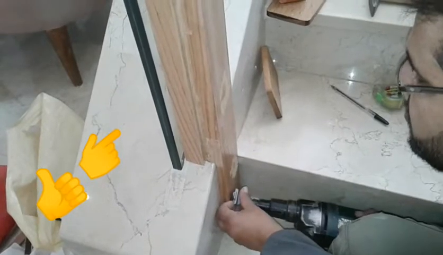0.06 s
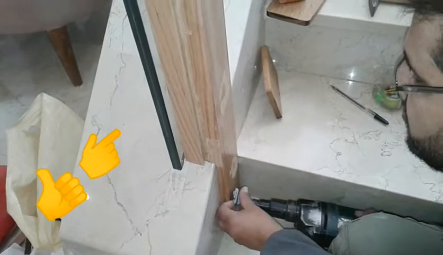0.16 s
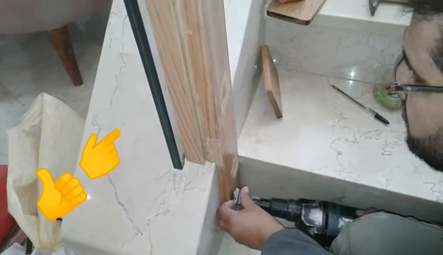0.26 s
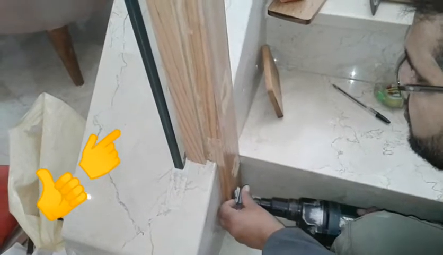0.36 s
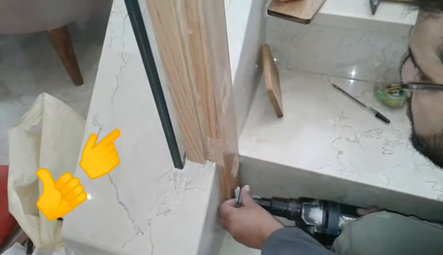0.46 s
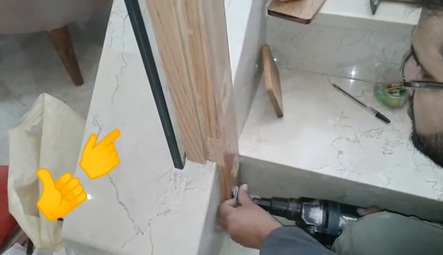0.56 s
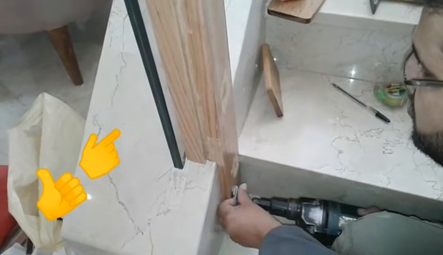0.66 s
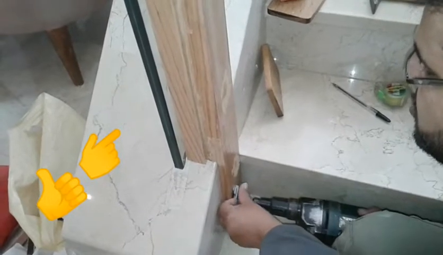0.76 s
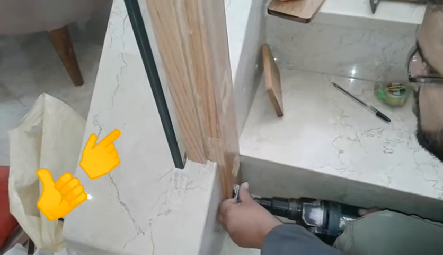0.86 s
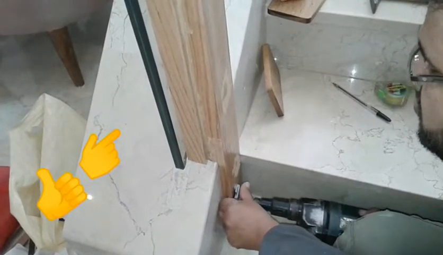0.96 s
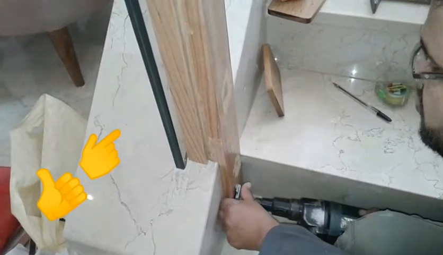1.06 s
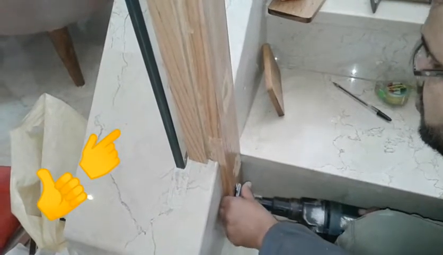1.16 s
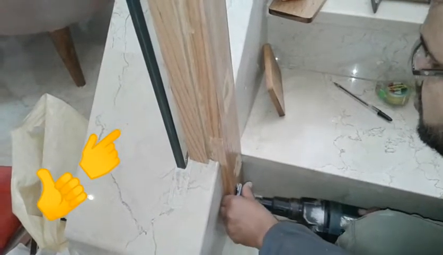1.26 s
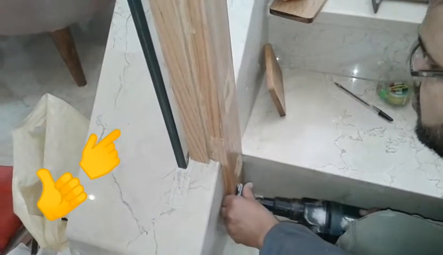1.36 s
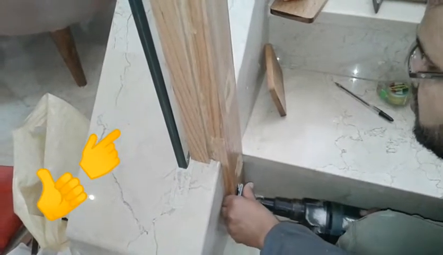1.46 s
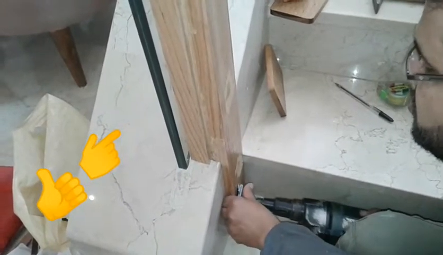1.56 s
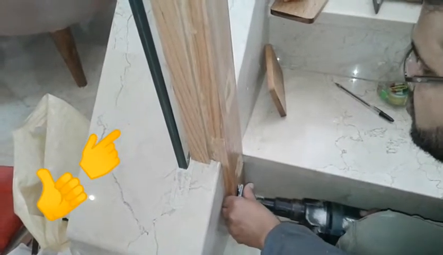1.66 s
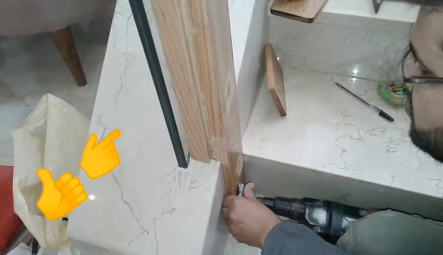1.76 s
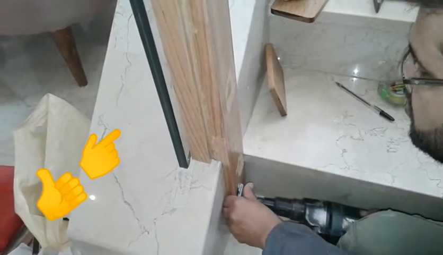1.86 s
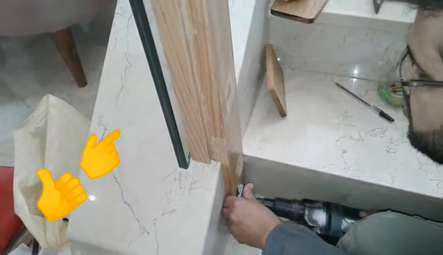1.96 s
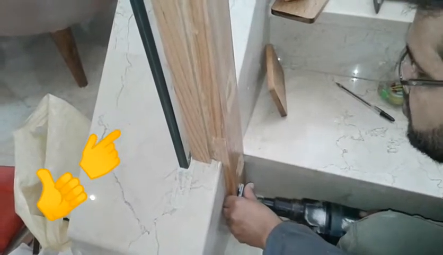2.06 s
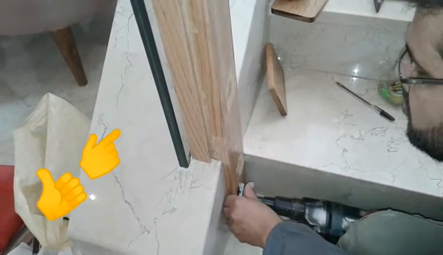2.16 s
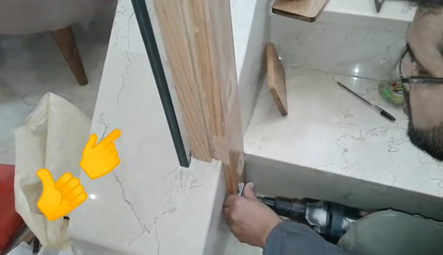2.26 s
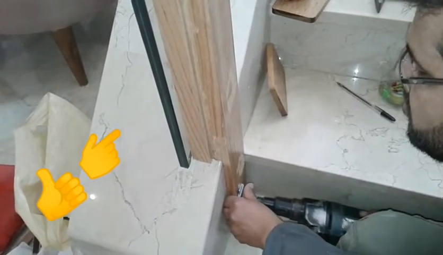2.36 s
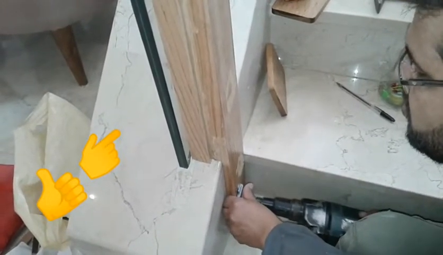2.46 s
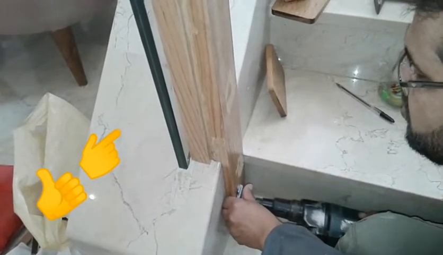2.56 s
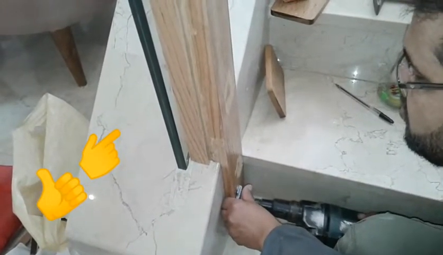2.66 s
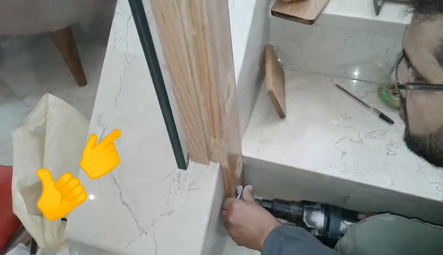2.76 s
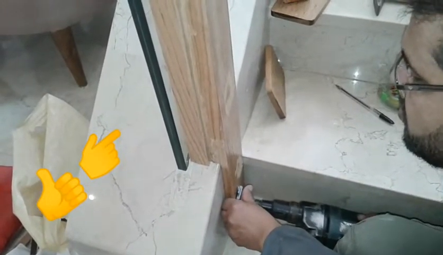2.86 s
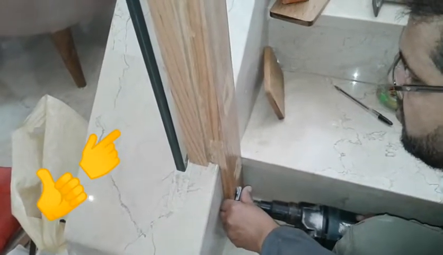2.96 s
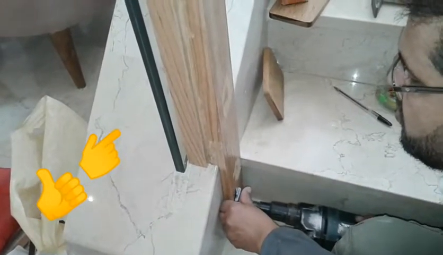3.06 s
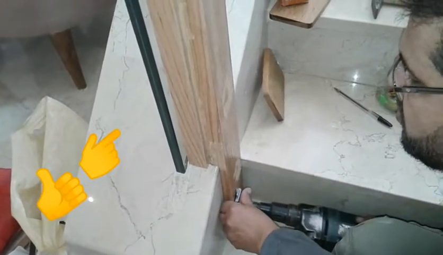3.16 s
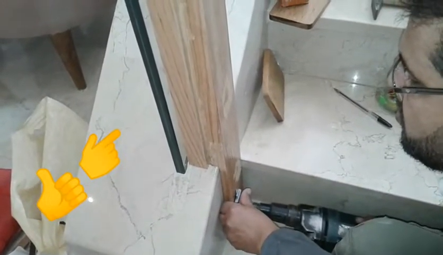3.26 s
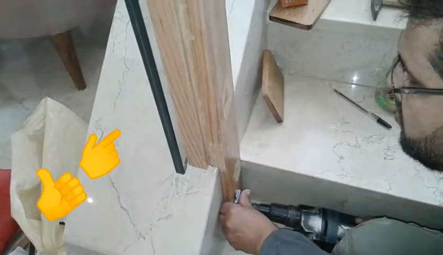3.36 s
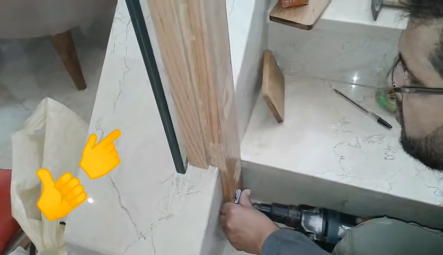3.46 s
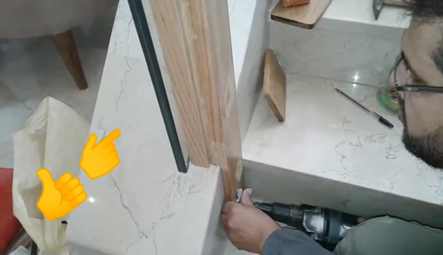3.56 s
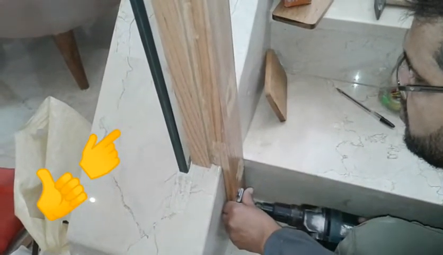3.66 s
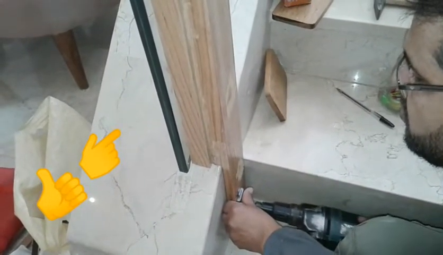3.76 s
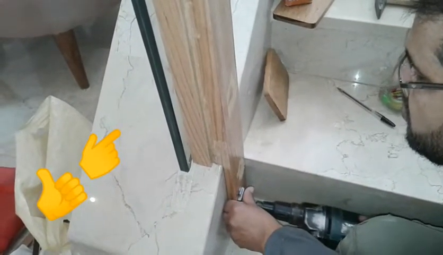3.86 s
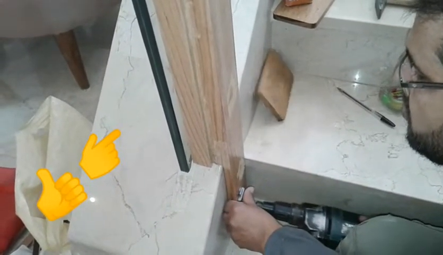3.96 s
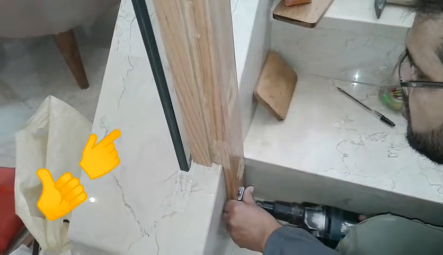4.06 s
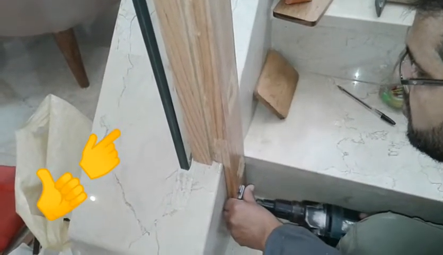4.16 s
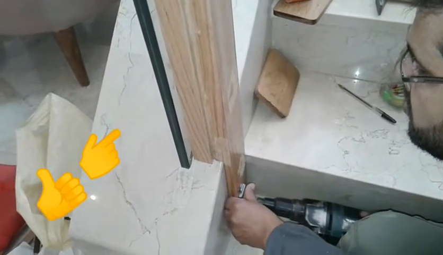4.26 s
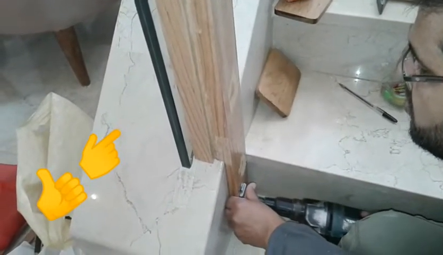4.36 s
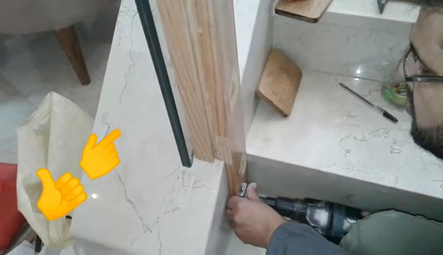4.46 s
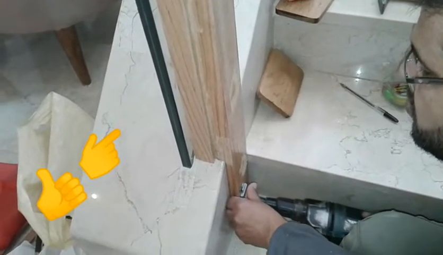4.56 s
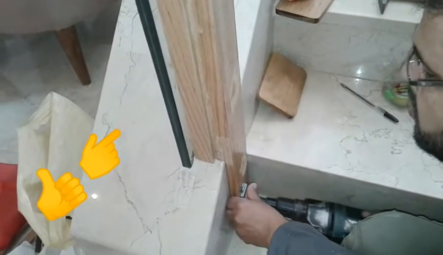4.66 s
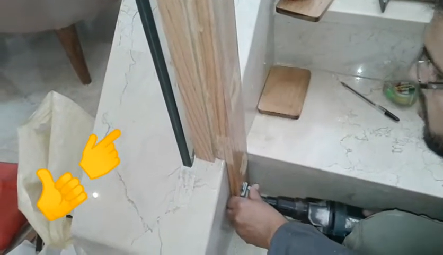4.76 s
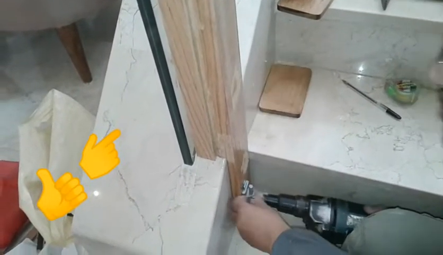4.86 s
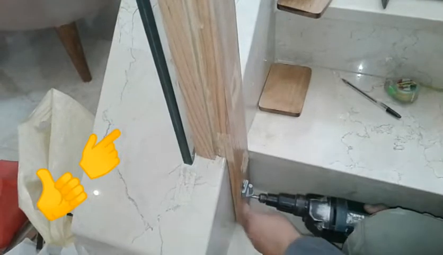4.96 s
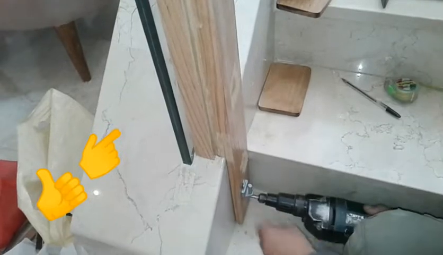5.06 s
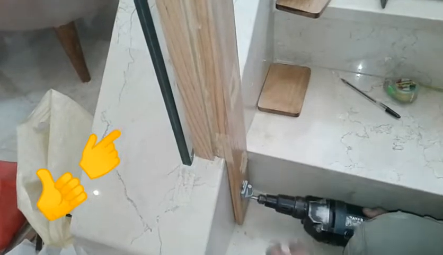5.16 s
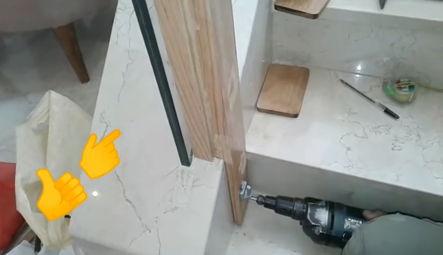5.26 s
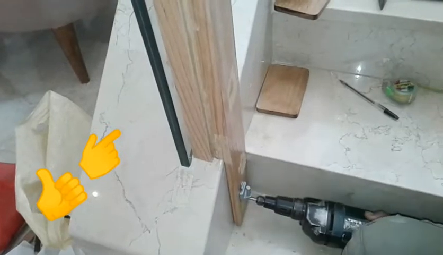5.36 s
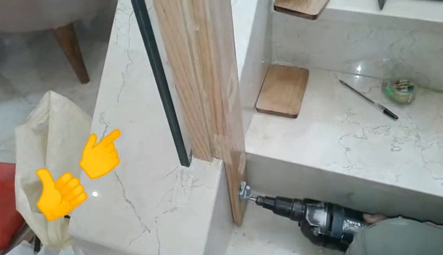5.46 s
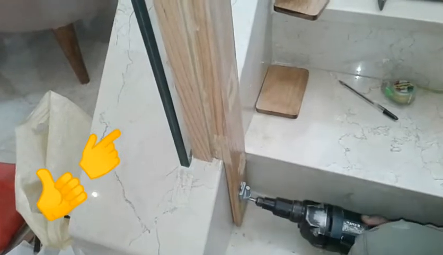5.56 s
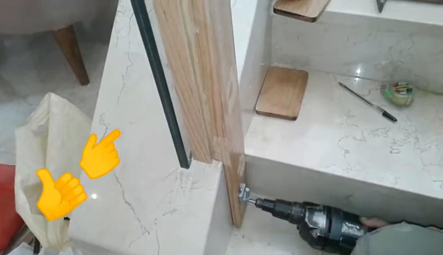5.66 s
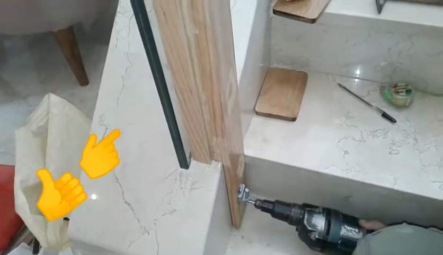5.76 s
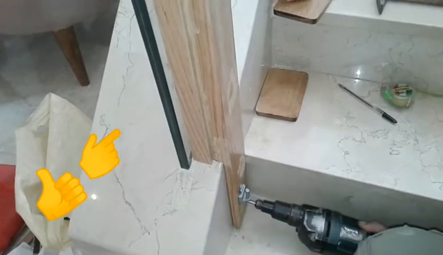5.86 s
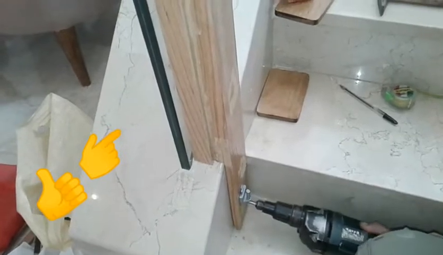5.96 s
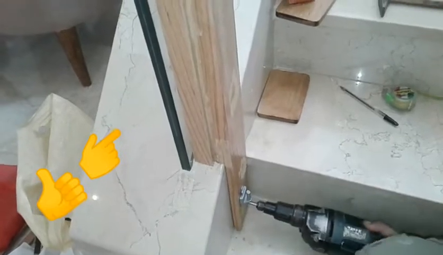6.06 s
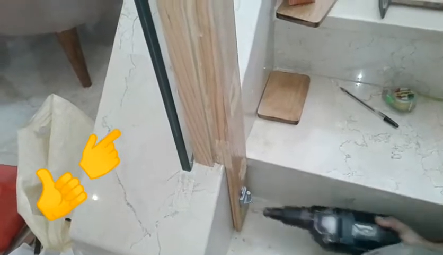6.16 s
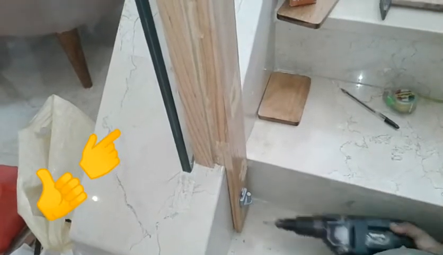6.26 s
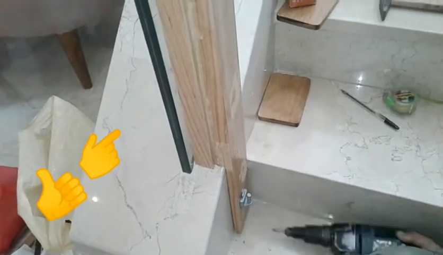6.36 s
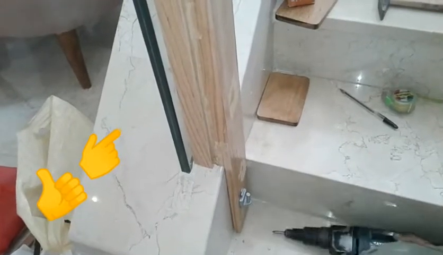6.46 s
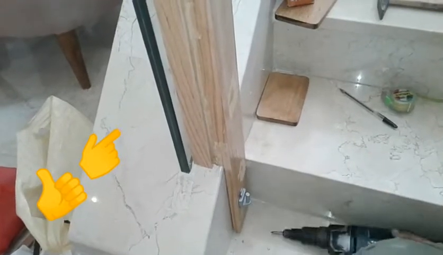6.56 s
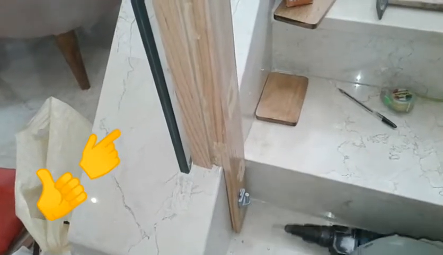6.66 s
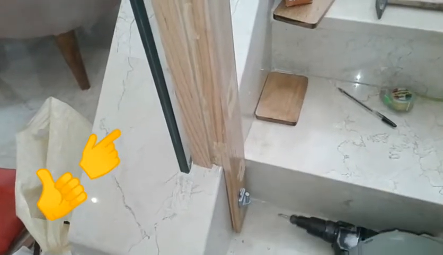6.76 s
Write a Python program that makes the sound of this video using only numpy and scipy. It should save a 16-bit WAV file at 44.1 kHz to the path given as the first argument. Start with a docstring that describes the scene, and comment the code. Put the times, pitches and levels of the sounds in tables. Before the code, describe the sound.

Close, harsh power drill whirring with rapid hammering buzz in a hard-walled tiled room, slowing to a coast before a quick metallic clatter.

```python
"""A corded drill works into a wooden door frame, close by, in a small tiled room.
The motor, noise pulsing per turn plus shaft-locked tones, speeds up and coasts with the trigger.
The bit hammers about once in 16 to 19 motor turns: noise crunches ring modes whose colour shifts.
The frame shudders (coloured noise) and hums (slow shaft tones); hard walls answer the blows.
Eased off, the tool runs down, the bit chatters once more, and the tool clacks off a steel bracket."""
import sys
import numpy as np
from scipy import signal
from scipy.fft import rfft, irfft, next_fast_len
from scipy.io import wavfile
from scipy.ndimage import uniform_filter1d, minimum_filter1d, map_coordinates

SR = 44100
rng = np.random.default_rng(int(sys.argv[2]) if len(sys.argv) > 2 else 0)


def bounce(signal):
    """Save signal as a 16-bit WAV file at the path given by the first command-line argument."""
    frames = np.transpose(np.atleast_2d(signal))
    limited = np.clip(frames, -1, 1)
    pcm = np.round(limited * 32767).astype(np.int16)
    wavfile.write(sys.argv[1], SR, pcm)


N = 299880


def amp(db):
    """Decibels to gain."""
    return 10 ** (np.asarray(db) / 20)


def unit(x):
    """Each row at rms 1."""
    return x / np.sqrt(np.mean(x ** 2, axis=-1, keepdims=True) + 1e-20)


def along(points, hz):
    """Interpolate (f/Hz, value) points on a log frequency axis."""
    f, value = np.transpose(points)
    return np.interp(np.log(hz + 1), np.log(f + 1), value)


def curves(rows):
    """One value per sample for each column after the time."""
    s, *columns = np.transpose(rows)
    return [np.interp(np.arange(N) / SR, s, column) for column in columns]


def wobble(rate_hz):
    """Smooth random curve with rate_hz knots a second."""
    knots = rng.standard_normal(int(N * rate_hz / SR) + 4)
    return map_coordinates(knots, [np.arange(N) * rate_hz / SR])


def filtered(x, response):
    """Multiply the spectrum of x by a response of frequency."""
    n = x.shape[-1]
    padded = next_fast_len(n + min(n, SR // 4))
    spectrum = rfft(x, padded) * response(np.fft.rfftfreq(padded, 1 / SR))
    return irfft(spectrum, padded)[..., :n]


def noise(spectrum):
    """Coloured noise of rms 1."""
    return unit(filtered(rng.standard_normal(N), lambda hz: amp(along(spectrum, hz))))


def placed(times_s, sounds):
    """Sum the rows of sounds, each laid down at its time."""
    starts = np.round(times_s * SR).astype(int)[:, None]
    at = np.maximum(starts + np.arange(sounds.shape[1]), 0)
    return np.bincount(at.ravel(), sounds.ravel(), N)[:N]


def burst(t, rise_s, t60_s):
    """Linear rise to 1, then exponential decay."""
    t = np.maximum(t, 0)
    return np.minimum(t / rise_s, 1) * amp(-60 * np.maximum(t - rise_s, 0) / t60_s)


def resonances(f, modes):
    """Summed response of damped modes (f/Hz, width/Hz, level/dB)."""
    return sum(amp(db) * 1j * f * w / (c * c - f * f + 1j * f * w) for c, w, db in modes)


# motor speed targets under the trigger: t/s, shaft f/Hz reached, time constant of the approach/s
SHAFT_TARGETS = [(0, 293.6, 1.7), (.14, 268.9, 1.7), (.69, 418.4, .22), (1.47, 265.2, 1.7),
                 (2.1, 416.5, .21), (3.15, 441.4, .9), (3.3, 434, 1.7), (3.4, 424.5, 1.7),
                 (3.77, 339.6, 1.7), (4.37, 428.8, .28), (5.03, 275.8, .95), (5.62, 217.1, 3),
                 (6.08, 156.3, 1.7), (6.8, 110, 1.8)]


def shaft_speed():
    """Turns a second: the motor approaches each target exponentially from the one before."""
    s, hz, lag_s = np.transpose(SHAFT_TARGETS)
    t = np.arange(N) / SR
    to = np.minimum(np.searchsorted(s, t, side="right"), len(s) - 1)
    elapsed = np.expm1((s[to - 1] - t) / lag_s[to])
    whole = np.expm1((s[to - 1] - s[to]) / lag_s[to])
    return hz[to - 1] + (hz[to] - hz[to - 1]) * elapsed / whole


# lean of the tool on the work: t/s, load (0 free, 1 normal push)
LOAD = [(0, 1.33), (.12, 1.07), (.33, 1.26), (.86, 1.37), (1.08, 1.11), (1.3, 1), (1.55, 1.2), (1.75, 1.03),
        (2.02, 1.1), (2.3, 0.89), (2.65, 1.09), (3.02, 0.88), (3.35, 1.13), (3.68, 0.89), (4.1, 1.14),
        (4.76, 0.93), (5.12, 0.14), (5.53, 0), (5.72, 0.6), (6.02, 0.25), (6.18, 0.17), (6.55, 0),
        (6.75, 0.28)]
FULL_HZ = 430


def level(law, speed):
    """A layer's dB: set by shaft speed and by load."""
    full_db, octave_db, load_db = law
    return full_db + octave_db * np.log2(speed / FULL_HZ) + load_db * (curves(LOAD)[0] - 1)


def shaken(blow_times_s, surge_db, settle_t60_s):
    """Gain: each blow loads gears and bit, so their noise jumps up and decays; slow average removed."""
    since_s = np.arange(SR // 8) / SR
    surge = burst(since_s, 0.0034, settle_t60_s)
    load = placed(blow_times_s, np.tile(surge, (len(blow_times_s), 1)))
    return amp(surge_db * (load - uniform_filter1d(load, size=4000)))


def patchy(x, patchy_db):
    """Resonances come and go: random gain, smooth over some 400 Hz and 80 ms."""
    z = signal.stft(x, nperseg=512)[2]
    field = uniform_filter1d(rng.standard_normal(z.shape), size=5, axis=0)
    field = uniform_filter1d(field, size=14, axis=1)
    gain = amp(patchy_db * field / np.std(field))
    return unit(signal.istft(z * gain, nperseg=512)[1][:N])


# noise spectra of gear rush, grinding, hiss and rasp: f/Hz, relative level/dB
GEARS = [(1500, -38), (2350, -7), (2650, -0.5), (3000, -0.5), (3800, 3.5), (4200, 0.5), (4620, 4.5),
         (5200, -3), (5750, -2.5), (6350, -4.5), (6800, -12.5), (9000, -27), (12000, -49)]
GRIND = [(700, -28.5), (1000, 2.5), (1400, -1), (1650, 0), (1950, 1.5), (2300, 3.5), (2800, -1.5),
         (5000, -57)]
HISS = [(4000, -48), (7000, 3.5), (9300, 0), (10200, -9), (12000, -10), (14000, -4), (15800, -2.5)]
RASP = [(1200, -35), (1500, -13), (1750, -1.5), (1950, -5), (2100, 2), (2450, -37)]
# their level laws: level/dB at FULL_HZ and load 1, slope/(dB/octave of speed), slope/(dB/unit load)
RUSH_LAW = (-25.5, 4.96, 7.4)
GRIND_LAW = (-31.5, 3.7, 8.7)
HISS_LAW = (-42.5, 7.6, 6.5)
RASP_LAW = (-29.5, 1.5, 21)  # before the factor blend squared
# blend between two knock colours: t/s, share of the second (0-1)
BLEND = [(0, 0.07), (2, 0.06), (2.5, 0.58), (3, .6), (3.6, 0.94), (4.55, 0.87), (5, 0.59), (5.6, 0.69),
         (6.8, 1)]


def rubbing(speed, turn, blow_times_s, once_per_turn=0.14, flutter_db=1.0):
    """Teeth, brushes and bit rub: noise pulsing once a turn, surging at each blow; rasp follows blend."""
    rub = amp(level(RUSH_LAW, speed)) * patchy(noise(GEARS), patchy_db=1.0)
    rub += amp(level(GRIND_LAW, speed)) * noise(GRIND)
    rub += amp(level(HISS_LAW, speed)) * noise(HISS)
    rub += amp(level(RASP_LAW, speed)) * curves(BLEND)[0] ** 2 * noise(RASP)
    bite = unit((1 + once_per_turn * np.cos(turn)) * amp(flutter_db * wobble(160)))
    return rub * bite * shaken(blow_times_s, surge_db=3.0, settle_t60_s=0.13)


# vent resonance: f/Hz, relative level/dB
VENT = [(400, -33), (560, -14), (660, -0.5), (790, 2), (880, -7.5), (1050, -11), (1600, -45)]
# level/dB at FULL_HZ and load 1, slope/(dB/octave of speed), slope/(dB/unit load)
VENT_LAW = (-32.5, 3.5, 9.1)


def vents(speed, turn, tone_db=-7):
    """Rushing air, and a second-order tone that swells as it crosses the vent resonance."""
    vent_db = level(VENT_LAW, speed)
    unsteady_db = 3.5 * wobble(14)
    phase = 2 * turn + .6 * wobble(50)
    tone = amp(vent_db + tone_db + along(VENT, 2 * speed) + unsteady_db) * np.sin(phase)
    return amp(vent_db) * noise(VENT) + np.sqrt(2) * tone


# level of the whine through the casing, at load 1: f/Hz, rms level/dB
WHINE = [(3200, -46), (4000, -36), (4700, -54), (5300, -55), (5700, -35), (6400, -56), (6900, -42),
         (7400, -67), (7900, -46.5), (8600, -52), (10500, -56), (12100, -53), (12600, -48.5), (12900, -41),
         (13300, -40.5)]


def rotor_whine(speed, turn, load_db=8):
    """Rotor tone at 30 times shaft speed, coloured by the casing, louder under load."""
    db = along(WHINE, speed * 30) + load_db * (curves(LOAD)[0] - 1) + 2 * wobble(40)
    return np.sqrt(2) * amp(db) * np.sin(30 * turn)


# gear and fan tones: multiple of shaft speed, level/dB re gear rush, extra level/dB while speeding up
ORDERS = [(12, -35, 15), (19, -31, 0), (24, -22, 0), (36, -26, 0), (48, -19, 0), (60, -9, 0), (72, -14, 0),
          (96, -10, 0), (108, -8, 0)]
# casing gain for these tones: f/Hz, gain/dB
CASING = [(500, -7.5), (1500, -1), (2300, 10.5), (2640, 12), (2850, 25), (3200, 14), (5000, 9), (7000, -11),
          (10500, -27), (16000, -31), (17500, -120)]


def gear_tones(speed, turn, backlash_rad=0.57):
    """Shaft orders through the casing; the pinion sings louder, tones roughen, as gears are sped up."""
    rush_db = level(RUSH_LAW, speed)
    acceleration = uniform_filter1d(np.gradient(speed) * SR, size=2000)
    drive = np.clip(acceleration / 250, 0, 1)
    tones = np.zeros(N)
    for order, order_db, drive_db in ORDERS:
        db = rush_db + order_db + drive_db * drive + along(CASING, order * speed) + 3.5 * wobble(25)
        roughness = backlash_rad * drive * wobble(400)
        tones += amp(db) * np.sin(order * turn + roughness)
    return np.sqrt(2) * tones


def motor(speed, blow_times_s, waver=0.00213):
    """Rubbing noise, air, whine and gear tones share one slightly wavering shaft angle."""
    turn = 2 * np.pi * np.cumsum(speed * (1 + waver * wobble(160))) / SR
    noises = rubbing(speed, turn, blow_times_s) + vents(speed, turn)
    return noises + rotor_whine(speed, turn) + gear_tones(speed, turn)


# shudder spectrum: f/Hz, relative level/dB
FRAME = [(26, -54), (45, -43), (75, -15.5), (100, -12.5), (117, -8), (151, -13), (226, -1), (265, -6.5),
         (324, 1), (387, -4), (417, -6), (560, -2.5), (730, -35), (1230, -120)]
# jolts as the tool labours, chatters or leaves: t/s, half-length to 1/e/s, extra shudder level/dB
JOLTS = [(1.414, 0.074, 9.5), (1.6, 0.072, 7), (4.774, 0.15, 9.5), (5.01, 0.11, 7.5), (5.916, 0.19, 9),
         (6.577, 0.055, 12.5)]
# slow shafts and bearings: multiple of motor speed, relative level/dB
LOW_ORDERS = [(.27, 1), (.54, -2), (.755, -2.5), (1, 0)]
# frame's uptake of their hum: f/Hz, gain/dB
UPTAKE = [(60, -24), (116, -20.5), (170, -7.5), (222, -15), (233, -5.5), (237, 4), (246, -4.5), (330, -4),
          (380, -5), (450, -6)]
# level/dB at FULL_HZ and load 1, slope/(dB/octave of speed), slope/(dB/unit load)
SHUDDER_LAW = (-47.5, -1.7, 11.8)
HUM_LAW = (-50, 3.3, 4.3)


def frame(speed, throb_db=2.0):
    """The door frame shudders as throbbing noise under load, and hums along with the slow shafts."""
    t = np.arange(N) / SR
    jolt_db = sum(db * np.exp(-((t - s) / length) ** 2) for s, length, db in JOLTS)
    throbbing = unit(noise(FRAME) * amp(throb_db * wobble(30)))
    shudder = amp(level(SHUDDER_LAW, speed) + jolt_db) * throbbing
    turn = 2 * np.pi * np.cumsum(speed * (1 + 0.0057 * wobble(20))) / SR
    hum = np.zeros(N)
    for order, order_db in LOW_ORDERS:
        db = order_db + along(UPTAKE, order * speed) + 2.7 * wobble(11)
        hum += amp(db) * np.sin(order * turn)
    return shudder + amp(level(HUM_LAW, speed)) * hum


TURNS_PER_BLOW, HAMMER_FROM_S, HAMMER_TO_S = 16, .05, 5.11
# delay of blows while the bit gives way: t/s, extra motor turns per blow
GIVE = [(.05, .01), (.14, 2.32), (.25, 0), (.35, 1.75), (.65, 1.25), (.73, .47), (1.38, .08), (1.71, 1.35),
        (2, 2.66), (2.18, 2.34), (2.44, 1.25), (3.17, .65), (3.54, .21), (4.45, .12), (4.77, 0),
        (4.93, .55)]
# mean blow strength: t/s, low knock relative level/dB, high clack relative level/dB
FORCE = [(.05, -20, -17), (.5, -20.5, -15.5), (.72, -24.5, -19), (1.07, -23, -16.5), (1.32, -23, -18),
         (1.55, -24, -14), (1.8, -22.5, -17.5), (2.3, -22, -18.5), (2.58, -22, -20.7), (2.95, -24, -18.5),
         (3.45, -23, -19.5), (3.68, -17.5, -16.5), (4, -18.5, -17), (4.22, -23, -17), (4.4, -20.5, -17.5),
         (4.73, -24, -15), (5.03, -21.5, -20.5), (5.1, -32, -38)]
# bit catching out of step, then chattering as it lifts off: t/s, clack relative level/dB
CATCHES = [(.006, -20.5), (.031, -29), (.088, -21), (.148, -18), (1.395, -17), (1.492, -16), (4.846, -25),
           (5.571, -21), (5.608, -24), (5.638, -18), (5.678, -18.5), (5.713, -18.5), (5.753, -18),
           (5.794, -17.5), (5.834, -18.5), (5.875, -20), (5.919, -19), (5.966, -19), (6.017, -19.5),
           (6.079, -27)]


def strikes(speed, knock_scatter_db=1.5, clack_scatter_db=1.0, catch_knock_db=-6):
    """(t/s, knock/dB, clack/dB): a blow per count of motor turns, plus the stray catches."""
    t = np.arange(N) / SR
    cycles = np.cumsum(speed / (TURNS_PER_BLOW + curves(GIVE)[0])) / SR
    first, last = np.interp([HAMMER_FROM_S, HAMMER_TO_S], t, cycles)
    s = np.interp(np.arange(first, last), cycles, t)
    knock_db, clack_db = [np.interp(s, t, db) for db in curves(FORCE)]
    chance = rng.standard_normal((len(s), 2)).T
    steady = [s, knock_db + knock_scatter_db * chance[0], clack_db + clack_scatter_db * chance[1]]
    catch_s, catch_db = np.transpose(CATCHES)
    return np.hstack([steady, [catch_s, catch_db + catch_knock_db, catch_db]])


# modes of bit, bracket and frame: f/Hz, width/Hz, mean level/dB in first colour, in second colour
WORK = [(793, 118, 1.5, -8), (1381, 130, 4, -23), (1543, 135, -25, 2), (1740, 27, -3.5, 2.5),
        (1962, 180, -11, 8), (2660, 146, 1, 4), (3100, 460, 2, -2.5), (3790, 270, -4, 7),
        (4420, 540, -3.5, -6), (5060, 180, -13, 2), (5320, 170, -3, -30), (5810, 65, 2.5, -42)]
# colour of the contact: f/Hz, relative level/dB
CONTACT = [(40, -50), (150, 3.5), (500, -4.5), (1000, 4.5), (1400, 6.5), (6400, 2.5), (6900, -8.5),
           (9000, -6.5), (10500, -14), (15500, -8.5)]


def hammer(blows, knock_db=-1, clack_db=-1.44, rise_s=0.0012, t60_s=0.025, lead_s=.0006,
           rebound_db=-14, rebound_s=0.0121, split_hz=2300):
    """Each blow, a short crunch and three rebounds, rings modes blended between two knock colours."""
    s, blow_knock_db, blow_clack_db = blows
    t = np.arange(SR // 16) / SR
    late, size = rng.standard_normal((len(s), 2, 3)).transpose(1, 2, 0)[..., None]
    rebound_times_s = rebound_s * np.exp(.45 * late)
    rebounds = amp(rebound_db + 0.34 * size) * burst(t - rebound_times_s, rise_s / 2, t60_s)
    power = burst(t, rise_s, t60_s) ** 2 + np.sum(rebounds ** 2, axis=0)
    crunch = np.sqrt(power) * rng.standard_normal(power.shape)
    blend = np.interp(s, *np.transpose(BLEND))[:, None]
    # the bit lands differently each time: own mix of modes per blow
    chance_db = 0.84 * rng.standard_normal((len(s), len(WORK))).T[..., None]
    modes = [(hz, width, first_db + blend * (second_db - first_db) + db)
             for (hz, width, first_db, second_db), db in zip(WORK, chance_db)]
    ring = filtered(crunch, lambda f: amp(along(CONTACT, f)) * resonances(f, modes))
    low = filtered(ring, lambda f: 1 / (1 + (f / split_hz) ** 10))

    def scaled(x, db):
        """Set the level of each blow's first 6 ms."""
        return x * amp(db)[:, None] / np.std(x[:, t < .006], axis=1, keepdims=True)

    knock = scaled(low, blow_knock_db + knock_db)
    clack = scaled(ring - low, blow_clack_db + clack_db)
    return placed(s - lead_s, knock + clack)


# reverberation: f/Hz, t60/s
ROOM = [(200, 0.91), (2000, 0.43), (6000, 0.03), (14000, 0.69)]


def room(x, delay_s=.004):
    """Hard walls answer with noise tails, a fresh random one per stretch; near 6 kHz dies fastest."""
    out = np.zeros(N + SR)
    for part in np.array_split(np.arange(N), 40):
        hz, t, z = signal.stft(rng.standard_normal(SR // 3), SR, nperseg=256)
        decay = amp(-60 * t / along(ROOM, hz)[:, None])
        tail = signal.istft(z * decay, SR, nperseg=256)[1]
        echo = signal.fftconvolve(x[part], tail / np.linalg.norm(tail))
        out[part[0] + int(delay_s * SR):][:len(echo)] += echo
    return out[:N]


# knocks on the bracket as the tool leaves: t/s, ring relative level/dB, crack relative level/dB
CLACKS = [(6.4993, -17, -13.5), (6.5145, -19, -34), (6.530, -15.5, -33), (6.548, -41, -20),
          (6.562, -16.5, -33)]
# bracket modes: f/Hz before detuning, relative level/dB, t60/s
BRACKET = [(1510, -10, 0.038), (2124, -3, 0.052), (2210, -12, 0.05), (3080, -27, .03), (4320, -18, .03),
           (4940, -22, 0.028)]


def clacks(ring_db=0, crack_db=1, rise_s=0.00098, t60_s=0.02):
    """The tool bounces off the steel bracket: a noise crack and a short modal ring each time."""
    s, hit_ring_db, hit_crack_db = np.transpose(CLACKS)
    t = np.arange(SR // 5) / SR
    # random detuning per knock, so that the rings do not line up
    detune = 1 + 0.027 * rng.standard_normal((len(s), 1))
    ring = sum(amp(db - 60 * t / life_s) * np.sin(2 * np.pi * hz * detune * t)
               for hz, db, life_s in BRACKET)
    # crack colour: f/Hz, relative level/dB
    colour = [(50, -45), (250, -27), (1000, -3), (3000, 4.5), (4500, 4.5), (6200, -5.5),
              (7000, -11), (11000, -23.5), (15000, -22)]
    snap = unit(filtered(rng.standard_normal(ring.shape), lambda hz: amp(along(colour, hz))))
    crack = snap * burst(t, rise_s, t60_s)
    rings = amp(hit_ring_db + ring_db)[:, None] * ring
    cracks = amp(hit_crack_db + crack_db)[:, None] * crack
    # so small a part radiates no bass
    return filtered(placed(s, rings + cracks), lambda f: (1j * f / (1j * f + 160)) ** 2)


def scene(room_db=-7):
    """The drill is close and dead ahead: both ears hear the same."""
    speed = shaft_speed()
    blows = strikes(speed)
    hits = hammer(blows) + clacks()
    mid = motor(speed, blows[0]) + frame(speed) + hits + amp(room_db) * room(hits)
    return np.array([mid, mid])


def record(dry, ceiling=.65, low_cut_hz=48, top_hz=15900):
    """A limiter holds down the peaks; deep bass and the top treble are cut."""
    needed = ceiling / np.maximum(np.abs(dry).max(axis=0), ceiling)
    gain = uniform_filter1d(minimum_filter1d(needed, size=90), size=90)
    return filtered(dry * gain, lambda hz: hz ** 2 / np.hypot(hz ** 2, low_cut_hz ** 2) * (hz < top_hz))


dry = scene()
out = record(dry)
bounce(out)
```